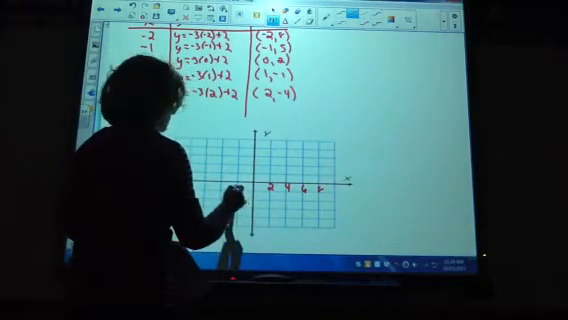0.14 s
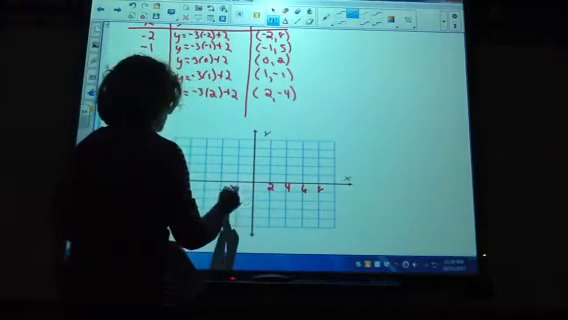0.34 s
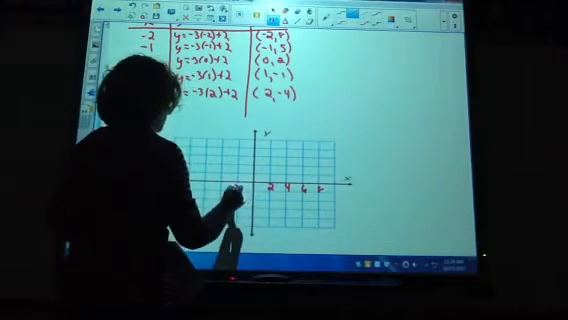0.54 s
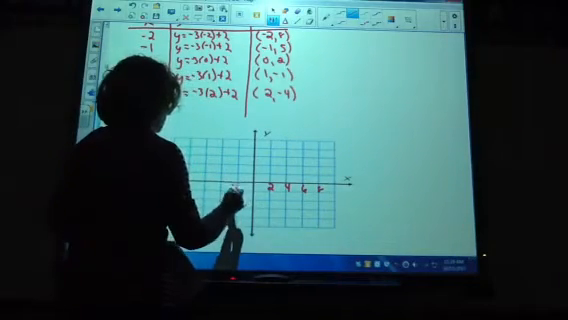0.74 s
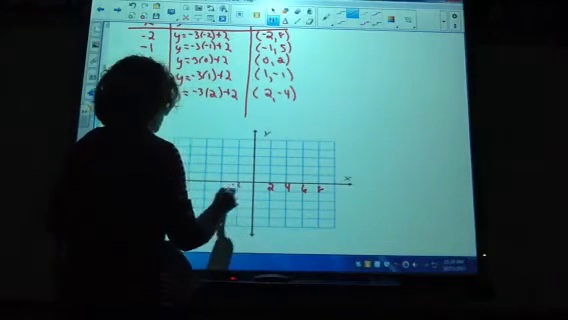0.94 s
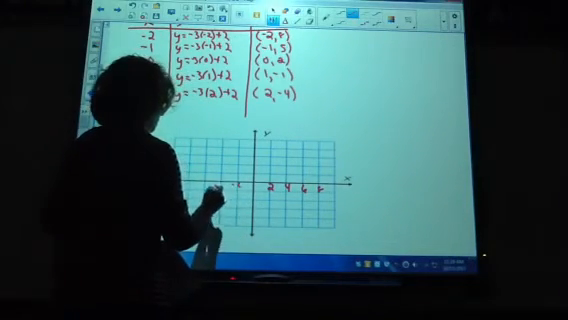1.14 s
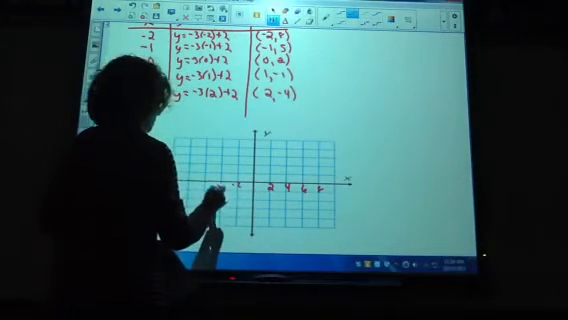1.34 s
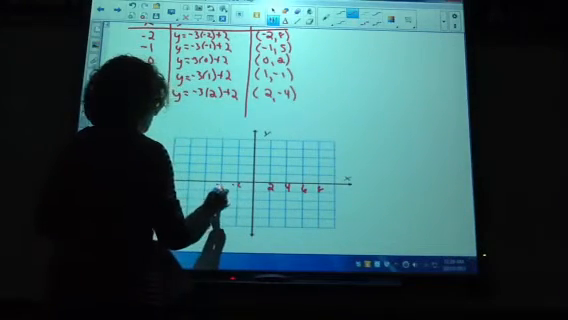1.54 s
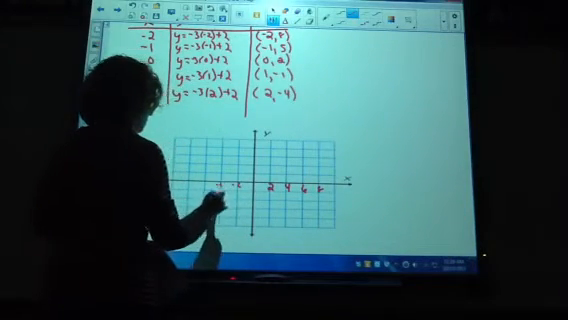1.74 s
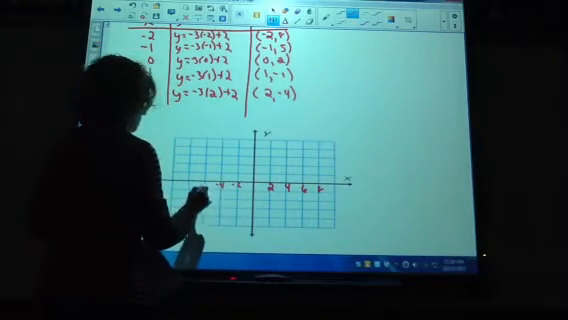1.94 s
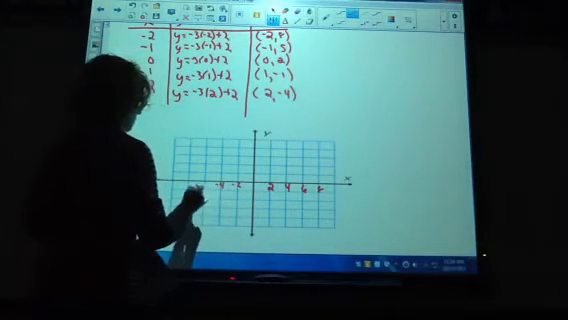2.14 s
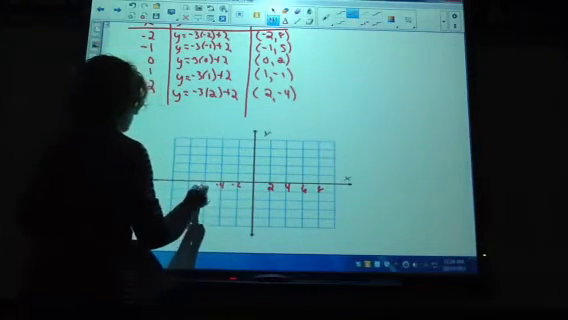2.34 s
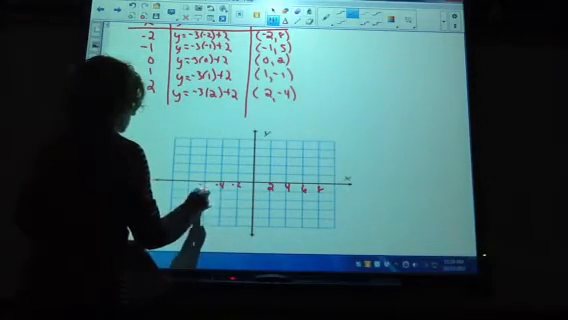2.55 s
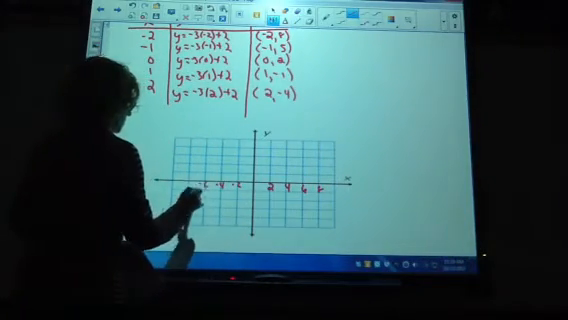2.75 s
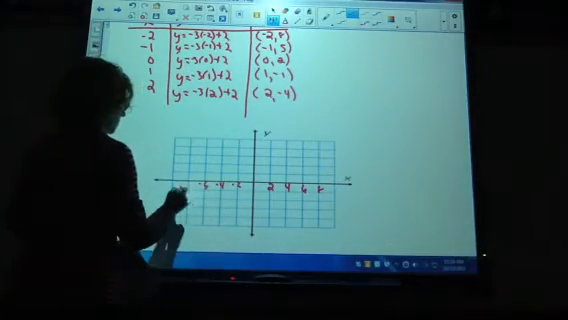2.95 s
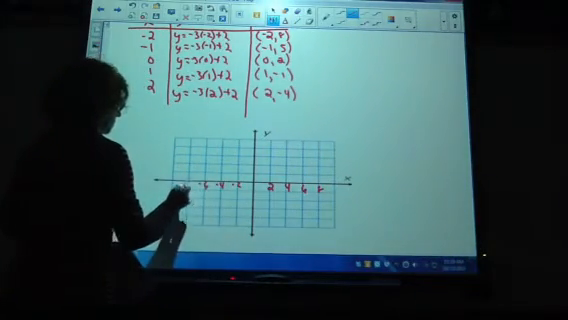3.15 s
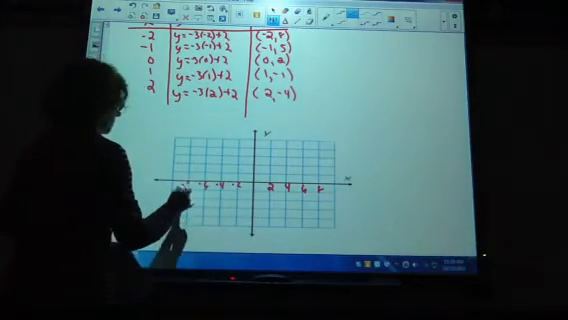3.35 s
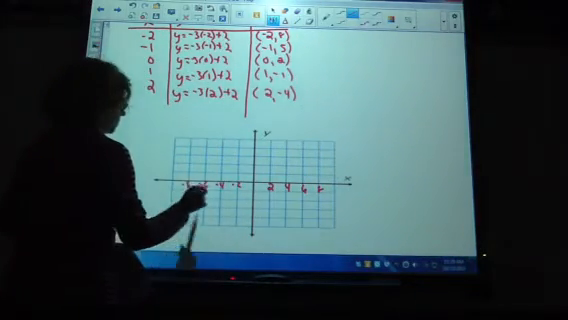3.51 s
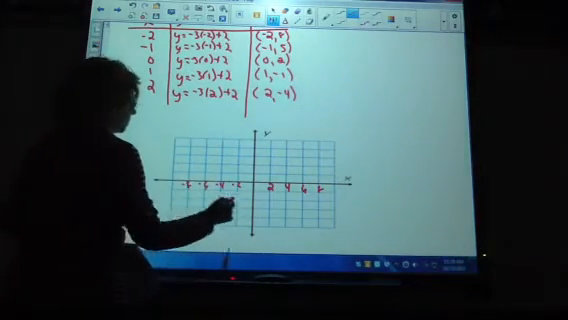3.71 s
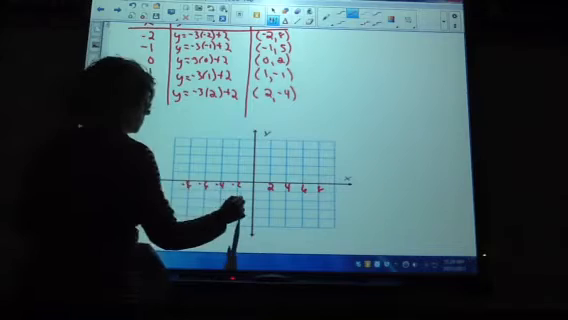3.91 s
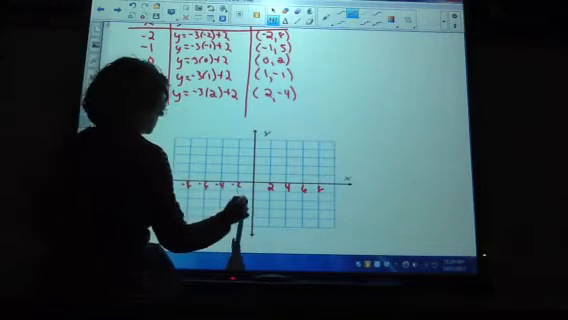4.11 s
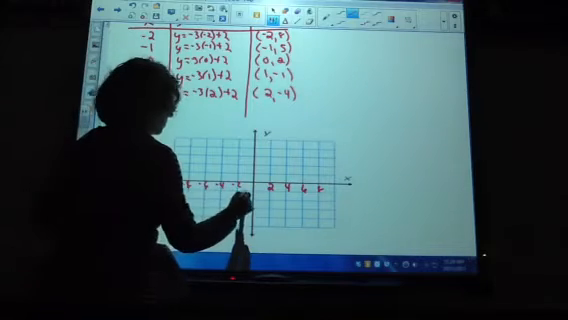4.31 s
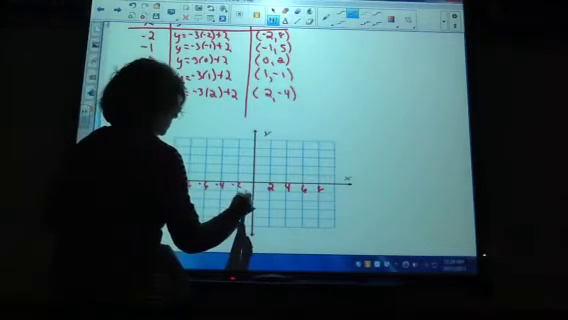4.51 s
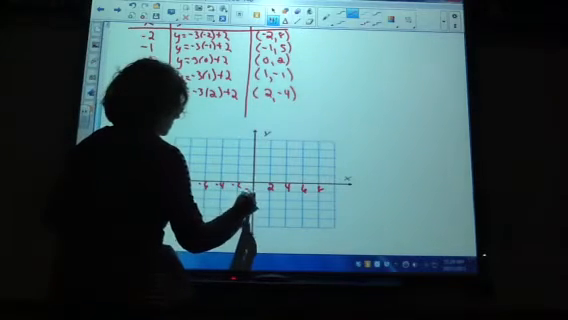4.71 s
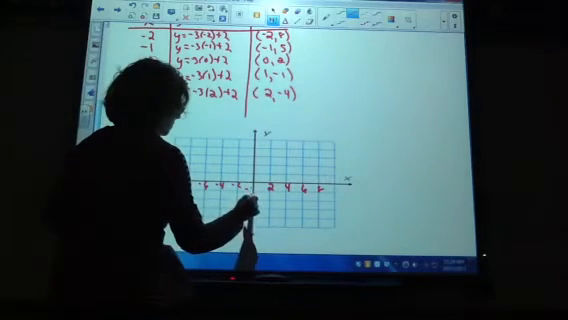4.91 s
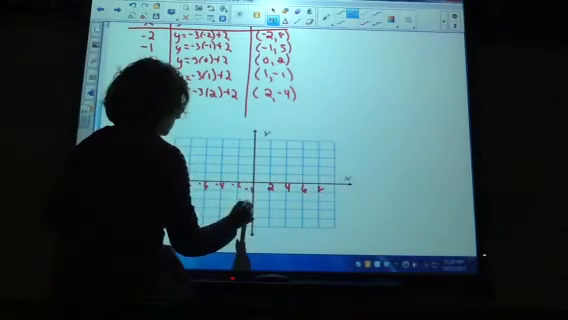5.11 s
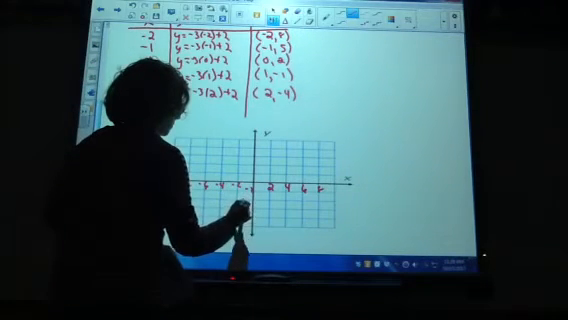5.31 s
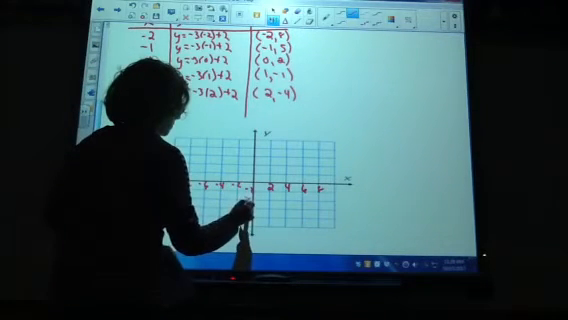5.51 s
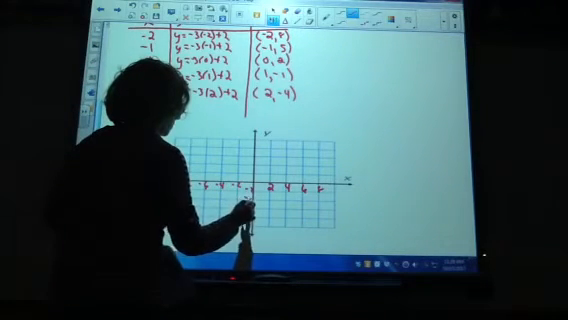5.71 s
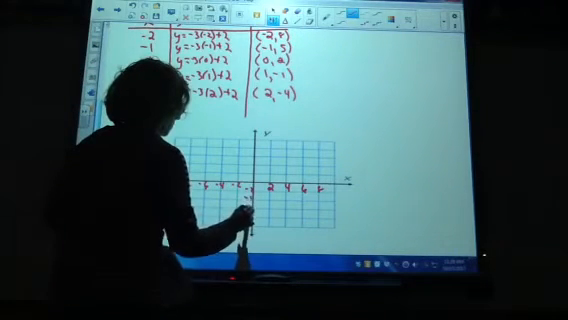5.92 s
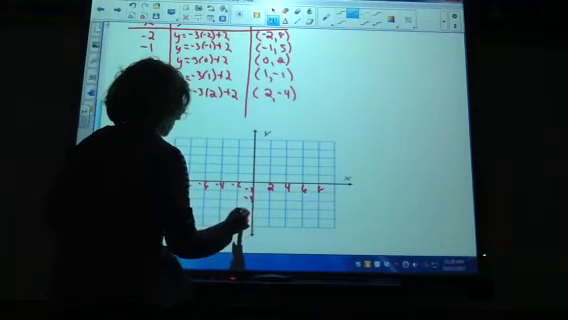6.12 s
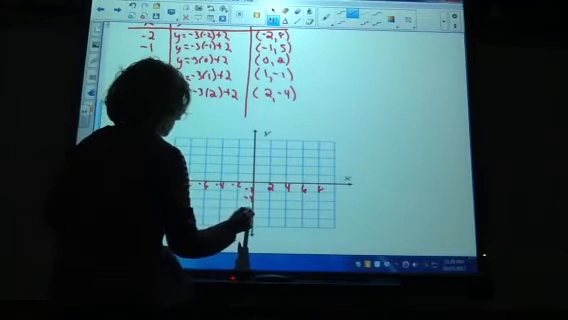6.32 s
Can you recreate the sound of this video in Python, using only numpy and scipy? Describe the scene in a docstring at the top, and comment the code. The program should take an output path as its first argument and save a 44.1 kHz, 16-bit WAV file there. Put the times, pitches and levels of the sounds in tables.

```python
"""Hollow knocks come in small groups: someone writes short numbers on a classroom's interactive whiteboard.
At each touch the nib of the plastic pen ticks, then the pen hits its stop and knocks the hollow panel,
and the room echoes. Between knocks the nib rubs faintly over the surface.
Behind it all a fan hums and the microphone hisses."""
import sys
import numpy as np
from scipy import signal
from scipy.fft import rfft, irfft
from scipy.io import wavfile

SR = 44100
rng = np.random.default_rng(int(sys.argv[2]) if len(sys.argv) > 2 else 0)


def generate_wav(sig):
    """Save sig (samples, or channels by samples) to the path in sys.argv[1] as 16-bit PCM at SR."""
    pcm = np.round(np.clip(np.atleast_2d(sig).T, -1, 1) * 32767).astype(np.int16)
    wavfile.write(sys.argv[1], SR, pcm)


N = 284886
AGE = np.arange(SR * 3 // 4) / SR   # seconds since a touch

# The colours of four noises. Each row: frequency in Hz, relative level in dB.
AIR_COLOUR = [(18, -87), (30, -45), (129, -22.5), (149, -12.5), (204, -10.5), (248, -2), (273, -4.5),
              (292, -6), (349, -7.5), (379, -7.5), (477, -9.5), (590, -12), (662, -15.5), (874, -16),
              (1500, -27.5), (1950, -64), (3300, -120)]
HISS_COLOUR = [(50, -14), (1000, -10), (1500, 3.5), (2000, 4), (2500, 6), (2800, 1.5), (4000, 1),
               (7000, 0.5), (11000, 0), (15500, -1.5)]
RUB_COLOUR = [(100, -45), (1500, -10.5), (2800, -13.5), (4200, -9), (5500, -14), (8000, -18.5),
              (14000, -22)]
CLACK_COLOUR = [(100, -33), (1000, 1.5), (1500, 3), (1900, -7.5), (2450, 0.5), (2900, -5.5), (3800, -0.5),
                (4800, -7.5), (7000, -13), (14000, -28)]
# The fan's tones. Each row: pitch in Hz, relative level in dB.
FAN_TONES = [(258.4, -75.5), (301.5, -67.5), (339.1, -81.5), (376.8, -70.5), (409.1, -87), (581.4, -80.5)]
# The nib's tones. Each row: pitch in Hz, relative level in dB, fade time (seconds to fall by 60 dB).
NIB_TONES = [(2450, -19, 0.0073), (3510, 2, 0.0072), (3820, -1.5, 0.0093), (4930, -5, 0.0055)]
# Low tones of panel and room that ring on. Each row: pitch in Hz, relative level in dB, fade in seconds.
LINGERING_TONES = [(153.6, -43.5, 0.69), (158.3, -46, 0.69), (179.5, -47, 0.65), (212, -51, 0.63),
                   (211.2, -41.5, 0.58), (240.7, -37.5, 0.71), (275, -42, .48), (302, -34, 0.43),
                   (318, -49, 0.67), (335, -38, 0.21), (396, -37, 0.82), (421, -41, 0.94),
                   (466, -38.5, 0.5), (474, -28.5, 0.22), (487, -31, 0.55), (499, -27, 0.46),
                   (501.7, -25.5, 0.33), (535, -35.5, 0.31), (554.5, -35, 0.78), (554.5, -30.5, 0.32),
                   (607, -52, 0.63), (619.2, -26.5, 0.28), (688, -40, 0.24), (803, -33, 0.57)]
# The room's wash of echoes. Each row: frequency in Hz, relative level in dB, fade in seconds.
ROOM_WASH = [(70, -0.5, 1), (112, -2.5, 0.69), (161, 14.5, 0.52), (294, 27, 0.37), (412, 26, 0.26),
             (530, 28.5, 0.3), (700, 20, 0.24), (900, 22, 0.27), (1150, 13.5, 0.23), (1430, 17.5, 0.17),
             (1840, 9, 0.23)]
# Strong first echoes of a knock. Each row: delay in milliseconds, strength (minus flips the wave).
EARLY_ECHOES = [(5.13, 2.5), (9.78, 1.61), (11.88, .32), (13.76, -1.86), (17.65, .75), (29.18, .5),
                (30.69, -.41)]
# The panel's short tones. Each row: pitch in Hz, strength (minus flips the wave), fade in seconds.
PANEL_TONES = [(180, -0.0345, 0.031), (280, -.19, .022), (325, .15, .036), (552, 1, .025),
               (572, -.68, .037), (763, -0.035, 0.049), (842, -0.087, 0.027), (1000, 0.029, 0.035),
               (1120, 0.033, 0.025), (1420, -0.104, 0.021), (1570, 0.31, 0.0022)]
# Extra panel tones that grow as the pen nears the frame. The rows read the same way.
EDGE_TONES = [(380, -0.067, 0.023), (713, .305, 0.026), (972, 0.076, .025)]
# The hand moves out towards the frame and back. Each row: time in seconds, nearness from 0 to 1.
HAND_PATH = [(.4, 0.18), (2.3, 0.58), (3.2, 0.84), (4.5, 0), (6.4, 0.2)]
# The pen's touches. Each row: start in seconds, relative level in dB, contact time in milliseconds,
# length in seconds of the stroke that follows (0 is just a tap).
TOUCHES = [(0.4393, -16, 2.21, 0), (0.6453, -17, 1.82, 0.28), (1.2571, -18, 1.44, 0.017),
           (1.466, -20.5, 1.54, .1), (1.6828, -17.5, 1.33, 0.1), (2.2347, -17.5, 1.29, 0),
           (2.4364, -19, 1.28, 0.31), (2.9933, -15, .9, 0.024), (3.184, -21.5, 1.61, 0.35),
           (4.548, -16, 1.51, 0.017), (4.7597, -17, 1.36, 0.25), (5.377, -20, 1.67, 0.018),
           (5.5923, -18, 1.45, 0.074), (5.7897, -18.5, 1.4, 0.12), (6.2114, -18, 1.41, 0),
           (6.4575, -18, 1.63, 0)]


def from_db(db):
    """Turn decibels into a number to multiply by."""
    return 10 ** (np.asarray(db) / 20)


def at_hz(table, hz, column=1):
    """Read a table at any frequency, sliding between its rows."""
    table = np.array(table)
    return np.interp(np.log(np.maximum(hz, 1)), np.log(table[:, 0]), table[:, column])


def keep_band(x, hz, kind, order):
    """Keep the "low" or the "high" side of a frequency."""
    return signal.sosfilt(signal.butter(order, hz, kind, fs=SR, output="sos"), x)


def noise(colour, size):
    """Noise of a given colour, at strength 1."""
    gains = from_db(at_hz(colour, np.fft.rfftfreq(size, 1 / SR)))
    x = irfft(rfft(rng.standard_normal(size)) * gains, size)
    return x / x.std()


def add(out, start_s, sound):
    """Mix a sound in at a given time."""
    start = max(round(start_s * SR), 0)
    part = sound[:max(N - start, 0)]
    out[start:start + len(part)] += part


def delayed(x, ms):
    """The same sound, arriving later."""
    return np.interp(AGE - ms / 1000, AGE, x, left=0)


def fade(seconds):
    """A curve that falls by 60 dB in the given time."""
    return np.exp(-np.log(1000) * AGE / seconds)


def ring(tones):
    """Fading tones; each swings the opposite way to the one before."""
    return sum((-1) ** (k + 1) * from_db(db) * np.sin(2 * np.pi * hz * AGE) * fade(fade_s)
               for k, (hz, db, fade_s) in enumerate(tones))


def fan(air_db=-64, hum_boost_db=1.5, waver=0.97, wavers_per_s=4):
    """A fan makes a rush of air and a few wavering tones."""
    t = np.arange(N) / SR
    out = from_db(air_db) * noise(AIR_COLOUR, N)
    waver_times = np.arange(200) / wavers_per_s
    for hz, db in FAN_TONES:
        # complex numbers let both the loudness and the timing of the wave drift
        drift = 1 + waver * (rng.standard_normal(200) + 1j * rng.standard_normal(200))
        steady = np.exp(2j * np.pi * (hz * t + rng.random()))
        tone = np.real(np.interp(t, waver_times, drift) * steady)
        out += from_db(db + hum_boost_db) * tone / tone.std()
    return out


def nib_rubbing(level_db=-71.5, rest_s=0.023, grain_db=2.5, grain_hz=150):
    """After a short rest the nib slides, with an uneven hiss that swells and fades with the stroke."""
    pressure = np.zeros(N)
    for start_s, _, _, stroke_s in TOUCHES:
        add(pressure, start_s + rest_s, np.sqrt(np.hanning(round(stroke_s * SR))))
    grain = keep_band(rng.standard_normal(N), grain_hz, "low", order=2)
    return pressure * from_db(level_db + grain_db * grain / grain.std()) * noise(RUB_COLOUR, N)


def pen_clicks(tick_db=-35, clack_db=-40, usual_contact_ms=1.53, lift_s=3.517, lift_db=-58.5):
    """The loose nib ticks as it lands; the pen's barrel clacks when the nib hits its stop."""
    out, tick = np.zeros(N), ring(NIB_TONES)
    clack_shape = fade(0.034) + from_db(-10) * fade(0.56)   # a sharp burst and a quieter tail
    for start_s, knock_db, contact_ms, _ in TOUCHES:
        db = knock_db - 2.5 * np.log2(contact_ms / usual_contact_ms)   # soft touches click less
        lead_s = 4.2 * contact_ms / 1000   # a slow touch takes longer to reach the stop
        add(out, start_s - lead_s, from_db(db + tick_db) * tick)
        add(out, start_s, from_db(db + clack_db) * noise(CLACK_COLOUR, len(AGE)) * clack_shape)
    add(out, lift_s, from_db(lift_db) * tick)   # once, the nib springs back as the pen lifts
    return out


def room_wash(start_s=0.0049, swell_s=0.054):
    """Many echoes blur together: bands of noise swell, then each fades at its own speed."""
    spectrum, out = rfft(rng.standard_normal(len(AGE))), 0
    freqs = np.fft.rfftfreq(len(AGE), 1 / SR)
    edges_hz = 56 * 2 ** (np.arange(17) / 3)   # three bands to an octave
    swell = np.clip((AGE - start_s) / swell_s, 0, 1)
    for low, high in zip(edges_hz, edges_hz[1:]):
        hz = np.sqrt(low * high)
        band = irfft(spectrum * ((freqs >= low) & (freqs < high)), len(AGE))
        band *= swell * fade(at_hz(ROOM_WASH, hz, column=2))
        band *= np.sqrt(2 * (high - low) / SR / np.sum(band ** 2))   # energy in step with band width
        out += band * from_db(at_hz(ROOM_WASH, hz))
    return out


def tip_push(contact_ms):
    """The springy tip pushes in one smooth bump; the shorter it is, the brighter the knock."""
    progress = AGE[:200] * 1000 / contact_ms
    force = np.sin(np.pi * np.minimum(progress, 1))
    return force / force.sum()


def panel(tones, bass_cut_hz=145):
    """The struck panel shakes in short tones; a filter thins the bass."""
    shake = sum(strength * np.sin(2 * np.pi * hz * AGE) * fade(fade_s) for hz, strength, fade_s in tones)
    return keep_band(shake, bass_cut_hz, "high", order=4)


def board_knocks(fresh_share=0.22, bass_cut_hz=85):
    """Each touch knocks the panel and the room answers; the tone depends on where the hand is."""
    middle, edge = panel(PANEL_TONES), panel(EDGE_TONES)
    ringing = delayed(ring(LINGERING_TONES), ms=14.05)
    shared_wash, out = room_wash(), np.zeros(N)
    for start_s, db, contact_ms, _ in TOUCHES:
        near_frame = np.interp(start_s, *np.transpose(HAND_PATH))
        # near the stiff frame the knock sounds harder and stands out more from its first echoes
        direct = middle + near_frame * edge
        echoes = sum(strength * delayed(direct, ms) for ms, strength in EARLY_ECHOES)
        early = from_db(1 + 2.5 * near_frame) * direct + (1 - 0.38 * near_frame) * echoes
        # part of the wash changes with the spot that is struck
        wash = np.sqrt(1 - fresh_share) * shared_wash + np.sqrt(fresh_share) * room_wash()
        response = early + ringing + from_db(6 * near_frame) * wash
        add(out, start_s, from_db(db) * np.convolve(response, tip_push(contact_ms)))
    # cut the deep bass so the knocks sound hollow, without a thump
    return keep_band(out, bass_cut_hz, "high", order=4)


def scene():
    """Board, pen and fan, heard from one spot."""
    return (board_knocks() + pen_clicks() + nib_rubbing() + fan())[None]


def record(dry, hiss_db=-67.2, treble_cut_hz=15350):
    """The microphone adds hiss, and the highest treble is cut off sharply."""
    sound = dry + from_db(hiss_db) * noise(HISS_COLOUR, N)
    return signal.sosfilt(signal.ellip(12, .1, 70, treble_cut_hz, fs=SR, output="sos"), sound)


dry = scene()
out = record(dry)
generate_wav(out)
```